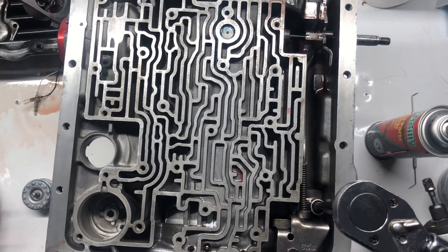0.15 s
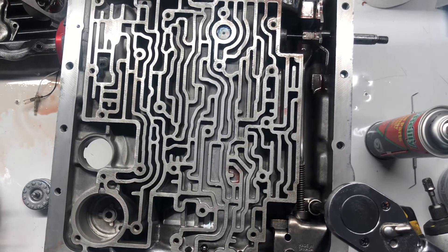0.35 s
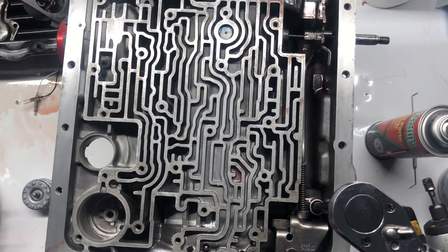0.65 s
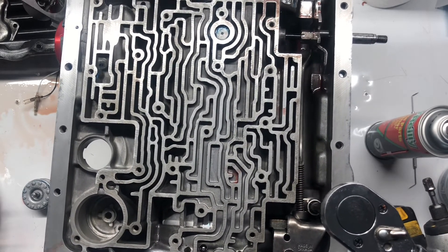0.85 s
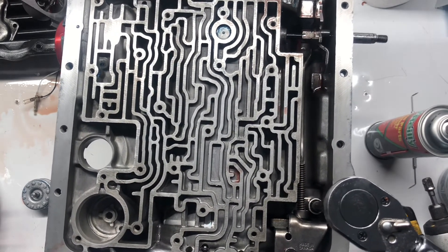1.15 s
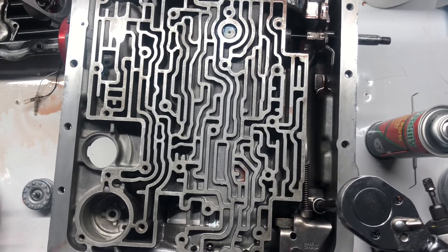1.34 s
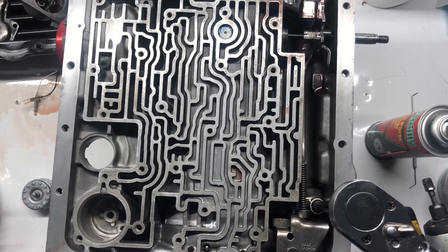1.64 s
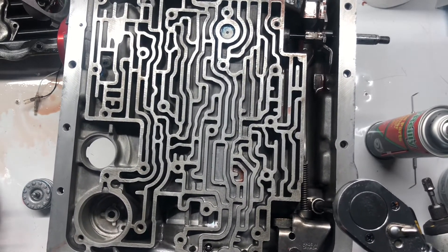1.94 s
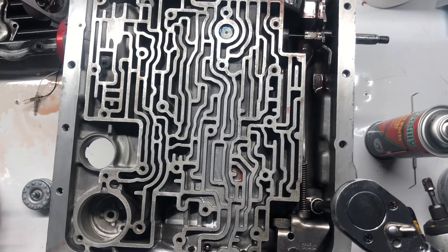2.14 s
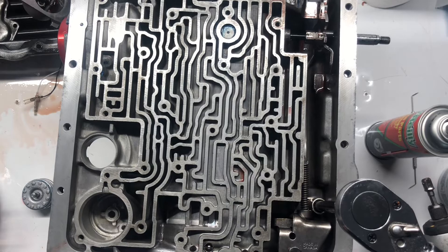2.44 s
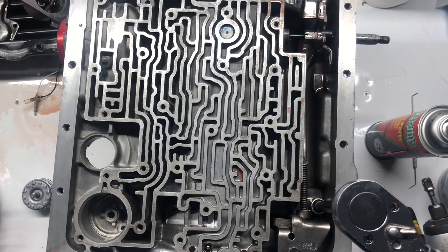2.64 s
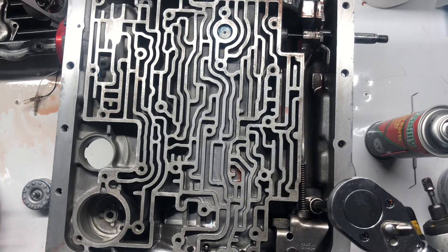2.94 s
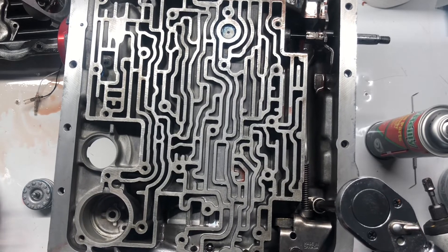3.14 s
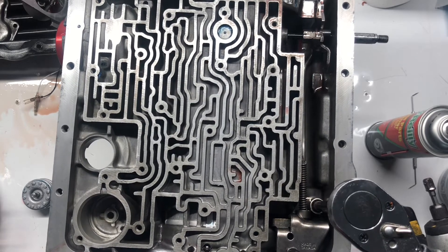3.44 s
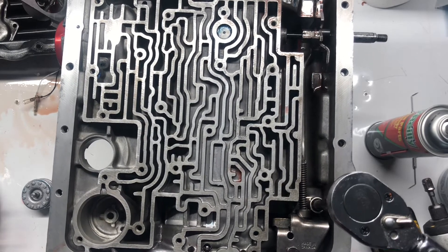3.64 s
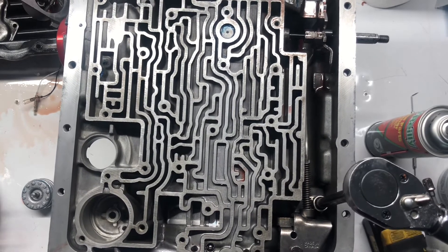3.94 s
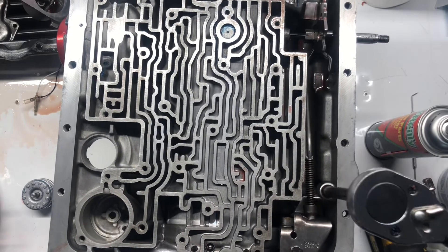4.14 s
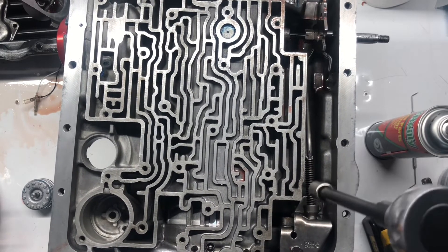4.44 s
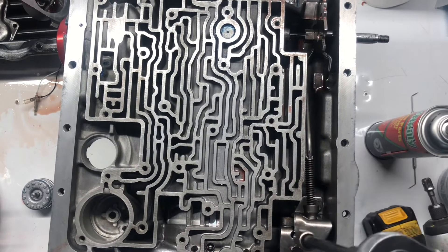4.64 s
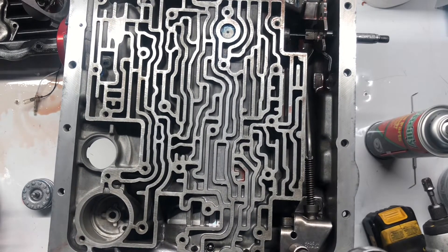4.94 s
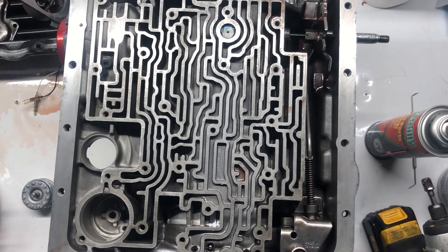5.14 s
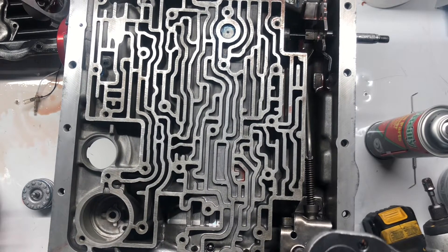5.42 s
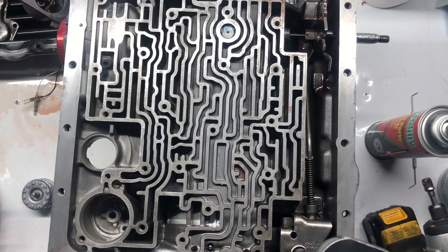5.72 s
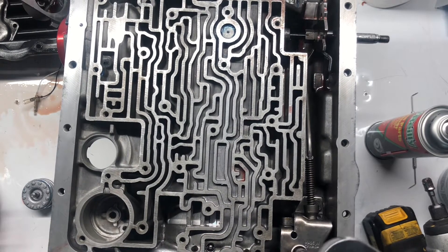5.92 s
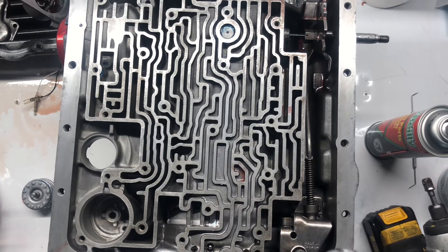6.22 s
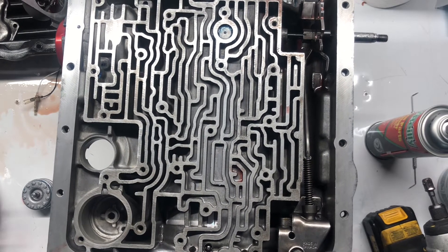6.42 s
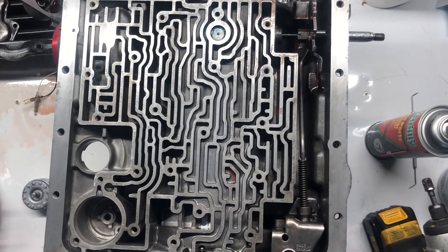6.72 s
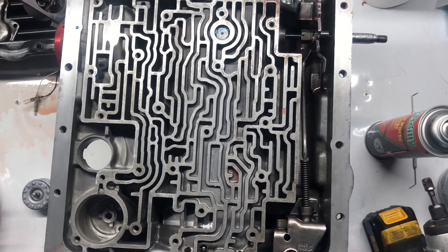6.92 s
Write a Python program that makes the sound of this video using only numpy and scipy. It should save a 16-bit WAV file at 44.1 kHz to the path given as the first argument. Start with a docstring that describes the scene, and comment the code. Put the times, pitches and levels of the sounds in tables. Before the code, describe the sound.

A quiet workshop heard from close by, with faint steady hum, low rumble and soft hiss from distant machines throughout. At 0.5 s a torque wrench gives a firm, short double-edged click, repeated at 0.94 s with a longer ring after a tiny tap. A freer, steely click rings at 1.66 s, followed by a dull handle bump at 1.76 s. A softer click comes at 2.48 s and a stronger one at 3.18 s. Light handle touches at 3.7 s lead into a thin swelling scrape, then a very loud, bright knock at 3.96 s with small bounces and a heavier casting clank at 4.03 s. At 4.69 s a socket knocks and rattles briefly. A sharp double clack lands at 4.98 s with a low bench thud. Faint slide at 5.5 s, high pin tick at 5.65 s, small taps at 6.0 and 6.64 s, then near quiet.

```python
"""Torque wrench in a workshop

A click-type torque wrench works on small bolts in a quiet workshop, close to one microphone.
Its pawl snaps over and rings the steel body; extension and socket come off, knock, bounce and are set down.
Each blow sums decaying modes with shaped noise; ticks, taps, bumps and light slides are filtered noise or modes.
The shop answers with a short tail of fading noise, over the hum and hiss of machines running far off."""
import sys
import numpy as np
from scipy import signal
from scipy.fft import rfft, irfft, next_fast_len
from scipy.io import wavfile
from scipy.ndimage import uniform_filter1d

SR = 44100
rng = np.random.default_rng(int(sys.argv[2]) if len(sys.argv) > 2 else 0)


def level_to_linear(level):
    """Convert decibel levels to linear amplitude factors, elementwise."""
    exponent = np.asarray(level, float) / 20
    return 10 ** exponent


def persist_wave(psi):
    """Save psi, clipped to +-1, as 16-bit WAV."""
    counts = np.round(np.clip(psi, -1, 1) * 32767).astype(np.int16)
    wavfile.write(sys.argv[1], SR, np.atleast_2d(counts).T)


N = 311787


def colour(x, points):
    """Linear filtering: a spectrum is multiplied by a gain drawn through (Hz, dB) points on a log axis."""
    hz, db = np.transpose(points)
    size = next_fast_len(len(x) + 4096)
    f = np.arange(size // 2 + 1) * SR / size + 1  # the 1 Hz offset avoids log(0)
    gain = level_to_linear(np.interp(np.log(f), np.log(hz), db))
    return irfft(rfft(x, size) * gain, size)[:len(x)]


def band(x, hz, width):
    """Simple resonance: two poles pass a band around the centre, where the gain is 1."""
    centre = min(hz, .45 * SR)
    q = hz / np.clip(width, 1, .4 * SR)
    b, a = signal.iirpeak(centre, q, SR)
    return signal.lfilter(b, a, x)


def level(x, db):
    """Mean power: scale a signal to an rms level."""
    return x * level_to_linear(db) / np.sqrt(np.mean(x ** 2))


def add(out, s, sound, db):
    """Superposition: add a sound at a time, its peak estimated from its strongest few milliseconds."""
    i = int(s * SR)
    peak = 2.4 * np.sqrt(uniform_filter1d(sound ** 2, SR // 300).max())
    out[i:i + len(sound)] += (sound * level_to_linear(db) / peak)[:N - i]


def ring(modes, rise_s, grip_hz=0):
    """Modal decay: wide modes start big and die fast, low ones build up over a few cycles; a grip damps all."""
    t = np.arange(int(.45 * SR)) / SR
    hz, width, db = np.transpose(modes)[:, :, None]
    width = width + grip_hz * (1 + hz / 6000)
    phase = rng.uniform(0, 2 * np.pi, hz.shape)
    swell = 1 - np.exp(-t / (rise_s + 1.7 / hz))
    decay = np.exp(-np.pi * width * t)
    return np.sum(level_to_linear(db) * width * swell * decay * np.sin(2 * np.pi * hz * t + phase), axis=0)


def cluster(modes, count=10):
    """Mode splitting: a thick part has several close modes where a bar has one; they beat and roughen the ring."""
    split = []
    for hz, width, db, spread_hz in modes:
        if spread_hz == 0:
            split.append((hz, width, db))
            continue
        for offset in rng.standard_normal(count):
            split.append((hz + spread_hz * offset, width, db - 10 * np.log10(count)))
    return split


def blows(rows, modes, long_modes, grit, feel):
    """Impact excitation: a few milliseconds of chatter, a fainter wash of countless small modes, and the ring."""
    out = np.zeros(N)
    ring_db, treble_db, chatter_s, wash_db, wash_s = feel
    hardest_db = max(row[1] for row in rows)
    for s, peak_db, low_db, free_db in rows:
        body = ring(modes, 0.00089, grip_hz=34.8) + level_to_linear(free_db) * ring(cluster(long_modes), .002)
        t = np.arange(len(body)) / SR
        contact_s = chatter_s * 2 ** (low_db / 9)  # heavier contact chatters longer, doubling every 9 dB
        noise = rng.standard_normal(len(t)) * (1 - np.exp(-t / 0.00015))
        # a blow that rings less rattles more
        wash = level_to_linear(wash_db - 0.5 * free_db) * noise * np.exp(-t / wash_s)
        # the wash is duller than the chatter: -4 dB at 12 kHz
        duller = wash + (level_to_linear(-4) - 1) * band(wash, 12000, 13000)
        chatter = colour(noise * np.exp(-t / contact_s) + duller, grit)
        head = slice(0, SR // 100)  # ring and chatter are balanced over the first 10 ms
        both = level_to_linear(ring_db) * body / body[head].std() + chatter / chatter[head].std()
        # softer blows lose treble: 0.51 dB per dB
        high_db = treble_db + 0.51 * (peak_db - hardest_db)
        bright = colour(both, [(1200, -60), (1700, 0.0), (6500, 0), (9500, high_db)])
        low = colour(both, [(350, low_db - 13), (750, low_db), (1400, low_db), (2000, -60.5)])
        # the slow bending of the whole part sets in a moment after the snap
        low = np.roll(low, int(0.0011 * SR))
        add(out, s, bright + low, peak_db)
    return out


def burst(fade_s, bands):
    """Source and filter: a fading puff of noise passes twice through each resonance, for steep bands."""
    t = np.arange(SR // 4) / SR
    grit = rng.standard_normal(len(t)) * np.exp(-t / fade_s)
    out = np.zeros(len(t))
    for hz, width, db in bands:
        steep = band(band(grit, hz, width), hz, 1.4 * width)
        out += level_to_linear(db) * np.sqrt(1000 / width) * steep  # even power whatever the width
    return out


def taps(rows, thing):
    """Struck resonator: each tap excites the bands of one small thing, tilted about 1 kHz."""
    out = np.zeros(N)
    for s, db, tilt_db, fade_s in rows:
        tilted = [(hz, width, g + tilt_db * np.log2(hz / 1000)) for hz, width, g in thing]
        add(out, s, burst(fade_s, tilted), db)
    return out


# spectrum of the shop's hiss: pitch_hz, relative_level_db (per Hz)
HISS_COLOUR = [(760, -32.5), (1300, -5.5), (1680, 1.5), (2140, -3), (2770, -5), (3140, -9), (4420, -9.5),
               (15200, -38.5), (16500, -32)]
# spectrum of the low rumble: pitch_hz, relative_level_db (per Hz)
RUMBLE_COLOUR = [(30, -26.5), (45, -1), (100, -3), (200, -6), (400, -4.5), (700, -10.5), (1000, -5.5),
                 (1400, -11.5), (2000, -42.5)]
# narrow humming bands of noise: pitch_hz, width_hz, rms_level_db
HUM_BANDS = [(48.5, 10, -69.5), (90.2, 9.4, -81), (111.53, 10, -67), (236.7, 12, -71), (276.9, 20, -67),
             (348.9, 20, -69), (571.1, 50, -60.5), (1012.5, 60, -77)]
# steady motor tones: pitch_hz, rms_level_db
MOTOR_TONES = [(118.4, -65.5), (736, -69.5), (1040, -65)]


def shop_air():
    """Stationary noise: hiss, rumble and humming bands, with motor tones modulated a little in phase and level."""
    t = np.arange(N) / SR
    out = level(colour(rng.standard_normal(N), HISS_COLOUR), -66)
    out += level(colour(rng.standard_normal(N), RUMBLE_COLOUR), -59)
    for hz, width, db in HUM_BANDS:
        out += level(band(rng.standard_normal(N), hz, width), db)
    for hz, db in MOTOR_TONES:
        waver = level(uniform_filter1d(rng.standard_normal(N), SR // 6), 0)
        tone = np.sin(2 * np.pi * hz * t + 0.28 * waver)  # phase wavers by 0.28 rad rms
        out += level(tone * level_to_linear(waver), db)  # level wavers by 1 dB rms
    return out


# short faint puffs of noise, some just before a loud knock: start_s, peak_level_db, pitch_hz, fade_s
FAINT_TICKS = [(.052, -61, 14000, .008), (.272, -66, 15000, .005), (1.763, -51, 13000, .015),
               (3.943, -36, 3500, 0.01), (3.9575, -30, 3997, .0032), (4.955, -47, 4500, 0.0084),
               (4.962, -48.5, 6000, 0.0088), (5.345, -44, 9860, 0.0032), (5.59, -58.5, 9000, 0.00806),
               (6.863, -59, 12000, 0.00299), (6.886, -57.5, 14000, 0.00345)]


def faint_ticks():
    """Broadband transient: each tick is a puff of noise in one band, set 1.2 times as wide as its pitch."""
    out = np.zeros(N)
    for s, db, hz, fade_s in FAINT_TICKS:
        add(out, s, burst(fade_s, [(hz, 1.2 * hz, 0)]), db)
    return out


# each click is two close contacts: a louder, brighter snap, then a softer one with more low sound:
# start_s, peak_level_db, weight_db (gain under about 1.5 kHz), long_ring_db
SEATED_BLOWS = [(.514, -17, -7.5, -5), (0.5173, -19.5, 3, -6), (0.9365, -17.5, -6.5, 1.5),
                (.940, -21.5, 3, 13)]
# short modes of the seated wrench: pitch_hz, width_hz (before the grip), level_db (at the top)
SEATED_MODES = [(420, 56, -6), (809.6, 11, 0), (1046.4, 9.6, -5.5), (1454, 25.6, -5.5), (2184, 73, -13),
                (4457, 41, -19), (5305, 47, -23.5), (7546, 15, -22.5), (8840, 49, -22.5), (10160, 36, -32),
                (13300, 30, -32), (15610, 39, -30.5)]
# long-ringing clusters: pitch_hz, width_hz, level_db, spread_hz
SEATED_LONG_MODES = [(1100, 4, 4.5, 0), (1331.4, 19.2, -13, 25.5), (2200, 25, -31, 90),
                     (4400, 4, -25, 251.5), (4930, 4, -25, 350), (8470, 9, -36.5, 900.5)]
# colour of the chatter: pitch_hz, level_db
SEATED_CHATTER = [(180, -52), (330, 2.5), (574, -18), (1100, 3), (1970, -10.5), (2250, -11), (3950, -19),
                  (4440, -11), (5100, -14), (8940, -22), (16000, -38)]
# how it takes a blow: ring_over_chatter_db, treble_db (hardest blow), chatter_s (at 0 dB weight),
# wash_db (at 0 dB long ring), wash_s
SEATED_RESPONSE = (-2.23, -0.4, 0.0017, -27, .05)


def seated_clicks():
    """Modal excitation: the pawl snaps while the wrench is seated, sounding its modes and chatter."""
    return blows(SEATED_BLOWS, SEATED_MODES, SEATED_LONG_MODES, SEATED_CHATTER, SEATED_RESPONSE)


# dull bumps: start_s, peak_level_db, swell_s (each mode adds its own build-up)
BENCH_BUMPS = [(.518, -38, 0.0038), (1.763, -35, 0.021), (4.705, -40, 0.0035), (4.988, -36, 0.0078)]
# resonances of the bench top: pitch_hz, width_hz, level_db
BENCH_MODES = [(121.6, 15.3, 1), (227, 23.2, -8), (328, 16.4, -9), (414.7, 31.6, -9), (485.4, 26.5, -3),
               (933.6, 61, -8.5)]


def bench_bumps():
    """Plate resonance: slow-rising bumps sound the low modes of the bench top."""
    out = np.zeros(N)
    for s, db, swell_s in BENCH_BUMPS:
        add(out, s, ring(BENCH_MODES, swell_s), db)
    return out


# start_s, peak_level_db, tilt_db (per octave), fade_s
SMALL_PART_TAPS = [(.896, -39.5, -3.5, .0045), (6.0053, -31, -4, .0012), (6.009, -41, -.5, .009),
                   (6.644, -32, 0.8, 0.0077)]
# bands of a small part: pitch_hz, width_hz (of the first pass), level_db (before tilt)
SMALL_PART_BANDS = [(2014, 970, 1), (2900, 800, .4), (4176, 750, -1), (5750, 1420, -4), (7960, 1600, -14)]


def part_taps():
    """Filtered impact: a small part is tapped and sounds in its broad bands."""
    return taps(SMALL_PART_TAPS, SMALL_PART_BANDS)


# pawl snaps of the free wrench: start_s, peak_level_db, long_ring_db
FREE_CLICKS = [(1.6602, -21.5, 2), (2.4845, -28, 4.5), (3.1782, -20.5, .3)]
# short modes of the wrench body: pitch_hz, width_hz (before the grip), level_db (at the top)
WRENCH_MODES = [(1019, 41, -5), (2169, 41, -12), (2670, 63, -23), (3159, 94, -21), (4260, 40, .4),
                (7041.5, 166, -9), (8815, 58, -26.5), (8959, 67, -6), (11450, 183, -11), (11588, 140, -21),
                (15438, 156, -10)]
# long-ringing clusters: pitch_hz, width_hz, level_db, spread_hz
WRENCH_LONG_MODES = [(1128, 3, 4, 0), (1075, 12, -4, 0), (1687, 8, -14, 30), (2731, 8, -13, 40),
                     (4160, 5, -24, 0), (4300, 8, -13, 130), (6363, 4, -19, 0), (6950, 12, -20, 150)]
# colour of the chatter: pitch_hz, level_db
WRENCH_CHATTER = [(470, -30), (800, -20), (1090, -0.5), (1350, -10.5), (2180, -9), (3600, -15),
                  (4240, -7.5), (5510, -16), (8880, -9.5), (10700, -16), (16000, -26.5)]
# ring_over_chatter_db, treble_db (hardest), chatter_s (0 dB weight), wash_db (0 dB long ring), wash_s
WRENCH_RESPONSE = (0.1, -5, 0.0103, -23, 0.0371)


def free_clicks():
    """Free vibration: the pawl snaps over and rings the steel body, every snap with one weight of -1.5 dB."""
    rows = [(s, db, -1.5, ring_db) for s, db, ring_db in FREE_CLICKS]
    return blows(rows, WRENCH_MODES, WRENCH_LONG_MODES, WRENCH_CHATTER, WRENCH_RESPONSE)


# start_s, peak_level_db, tilt_db (per octave), fade_s
HANDLE_TOUCHES = [(1.7605, -32, -3, 0.0224), (3.696, -35, .3, .012), (3.754, -36, 5, .0035)]
# bands of the handle: pitch_hz, width_hz (of the first pass), level_db (before tilt)
HANDLE_BANDS = [(950.8, 780, .5), (3500, 2870, -8), (7000, 5000, -11), (13000, 5980, -15)]


def handle_taps():
    """Damped impact: taps on the handle give very broad bands of fading noise."""
    return taps(HANDLE_TOUCHES, HANDLE_BANDS)


# metal sliding lightly: start_s, end_s, end_level_db (rms), swell_db, pitch_share
LIGHT_SLIDES = [(3.76, 3.958, -66, 12, .6), (5.46, 5.555, -71, .3, .99)]
# what it rings with: pitch_hz (before pitch_share), width_hz, level_db
SLIDE_BANDS = [(5970, 1500, 0.5), (7600, 490, -1.5), (9000, 250, 1), (10800, 620, -6.5), (12500, 500, -9)]


def slides():
    """Friction noise: steady random excitation of a few resonances, swelling to the end of the slide."""
    out = np.zeros(N)
    for start, end, db, swell_db, share in LIGHT_SLIDES:
        grit = rng.standard_normal(int((end - start) * SR))
        scrape = sum(level_to_linear(g) * band(grit, share * hz, width) for hz, width, g in SLIDE_BANDS)
        swell = level_to_linear(np.linspace(-swell_db, 0, len(grit)))
        i = int(start * SR)
        out[i:i + len(grit)] += level(scrape, db) * swell
    return out


# start_s, peak_level_db, weight_db (gain under about 1.5 kHz), long_ring_db
EXTENSION_BLOWS = [(3.9604, -6.5, -5, -1), (3.9622, -8, 3, -1.5), (3.984, -23, 0, -1.5),
                   (3.997, -32.5, -1.5, -1.5)]
# short modes of the extension: pitch_hz, width_hz (before the grip), level_db (at the top)
EXTENSION_MODES = [(1041, 63, -5), (2872, 98, -7.5), (3940, 210, -6), (5450, 130, -9.5), (5793, 92, -4.5),
                   (6780, 190, -9.5), (7690, 100, -3.5), (8837, 170, 5), (10070, 109.3, -15),
                   (11400, 150, -15), (12200, 190, -14), (15520, 110, -19)]
# long-ringing clusters: pitch_hz, width_hz, level_db, spread_hz
EXTENSION_LONG_MODES = [(1071.2, 25, -6.5, 13), (3940, 15, -12, 200), (5600, 20, -17, 500),
                        (9080, 30, -15, 200)]
# colour of the chatter: pitch_hz, level_db
EXTENSION_CHATTER = [(350, -55.5), (600, -28.5), (1040, -1.5), (2570, -12.5), (4050, -10), (4710, -21),
                     (5190, -3), (8270, -11.5), (8860, -7), (10300, -15.5), (16000, -30.5)]
# ring_over_chatter_db, treble_db (hardest), chatter_s (0 dB weight), wash_db (0 dB long ring), wash_s
EXTENSION_RESPONSE = (-4.5, .8, .0035, -17, .016)


def extension_knocks():
    """Repeated impact: the extension knocks and bounces, each contact exciting its modes anew."""
    return blows(EXTENSION_BLOWS, EXTENSION_MODES, EXTENSION_LONG_MODES, EXTENSION_CHATTER,
                 EXTENSION_RESPONSE)


# start_s, peak_level_db, weight_db (gain under about 1.5 kHz), long_ring_db
CASTING_BLOWS = [(4.029, -8, -1.63, -3), (4.034, -13, -3, 8)]
# short modes of the casting: pitch_hz, width_hz (before the grip), level_db (at the top)
CASTING_MODES = [(1090.6, 85, 6.5), (2226.7, 150, 7), (4100, 120, -17), (4210, 140, -21),
                 (6100, 250, -18.5), (6100, 150, -9), (6604, 85, 1), (7026, 76, -11.5), (9610, 87, -15),
                 (10270, 82, -12.5), (12000, 100, -19.5), (15100, 140, -25.5)]
# long-ringing clusters: pitch_hz, width_hz, level_db, spread_hz
CASTING_LONG_MODES = [(1114, 9, -20, 0), (1940, 10, -11, 50), (2120, 3, -6, 50), (2340, 3, -7, 25),
                      (3400, 10, -20, 150), (4300, 10, -19, 500), (6300, 10, -21, 600)]
# colour of the chatter: pitch_hz, level_db
CASTING_CHATTER = [(290, -39.5), (500, -23), (1000, -6.5), (1670, -1.5), (2070, -2.5), (2610, -15),
                   (4400, -5.5), (4940, -13.5), (7000, -11.5), (7750, -14), (16000, -32)]
# ring_over_chatter_db, treble_db (hardest), chatter_s (0 dB weight), wash_db (0 dB long ring), wash_s
CASTING_RESPONSE = (-7, -1.21, 0.0056, -26, .035)


def casting_knocks():
    """Modal density: knocks on a casting sound close groups of modes that beat together."""
    return blows(CASTING_BLOWS, CASTING_MODES, CASTING_LONG_MODES, CASTING_CHATTER, CASTING_RESPONSE)


# start_s, peak_level_db, weight_db (gain under about 1.5 kHz), long_ring_db
SOCKET_BLOWS = [(4.6872, -18.5, -3, 0), (4.697, -29.5, -4, -3.5), (4.7035, -26, -0.5, -2),
                (4.7167, -29, 7.5, -7), (4.732, -47.5, 6, -3.5)]
# short modes of the socket: pitch_hz, width_hz (before the grip), level_db (at the top)
SOCKET_MODES = [(822, 140, 4.5), (2014, 88, -13), (4490, 84, -4), (5310, 360, -2.5), (5960, 170, -10),
                (7113, 81, -2), (8075, 184, -5), (8950, 100, -4), (12240, 116, 0)]
# long-ringing clusters: pitch_hz, width_hz, level_db, spread_hz
SOCKET_LONG_MODES = [(862, 20, -16.5, 27), (3690, 20, -6.5, 130), (8985, 15, -17.5, 60),
                     (11900, 20, -17.5, 200)]
# colour of the chatter: pitch_hz, level_db
SOCKET_CHATTER = [(350, -42.5), (600, -15), (823, -2), (1800, -14), (2610, -10), (3080, -14.5),
                  (4050, -2.5), (9110, -16), (9890, -21.5), (12200, -14), (16000, -34.5)]
# ring_over_chatter_db, treble_db (hardest), chatter_s (0 dB weight), wash_db (0 dB long ring), wash_s
SOCKET_RESPONSE = (-4.5, 2, 0.003, -23, .025)


def socket_knocks():
    """Repeated impact: the socket knocks and bounces, softer contacts losing treble."""
    return blows(SOCKET_BLOWS, SOCKET_MODES, SOCKET_LONG_MODES, SOCKET_CHATTER, SOCKET_RESPONSE)


# start_s, peak_level_db, weight_db (gain under about 1.5 kHz), long_ring_db
LAY_DOWN_BLOWS = [(4.9761, -12, -5.5, -4), (4.9785, -13.5, 1, 5)]
# short modes of what is laid down: pitch_hz, width_hz (before the grip), level_db (at the top)
LAY_DOWN_MODES = [(833, 62, 1.5), (2292, 152, -8.5), (2702.4, 88, -4), (3690, 93, -8.5), (4055, 100, -8),
                  (5020, 110, -12.5), (5590, 122, -2.5), (7000, 112, -6.5), (7882, 170, -2.5),
                  (9000, 110, -8), (11195, 250, -10.5), (13740, 300, -6.5)]
# long-ringing clusters: pitch_hz, width_hz, level_db, spread_hz
LAY_DOWN_LONG_MODES = [(2280, 11, -8, 30), (2780, 8, -9, 40), (3635, 8, -15, 60), (5006, 8, -11, 250),
                       (8043, 9, -17, 80), (9039, 12, -17, 80)]
# colour of the chatter: pitch_hz, level_db
LAY_DOWN_CHATTER = [(240, -41), (400, -17.5), (893, -4.5), (1580, -21), (2220, -5.5), (3260, -13),
                    (4950, -3), (6150, -7.5), (7870, -8), (13500, -11), (16000, -32)]
# ring_over_chatter_db, treble_db (hardest), chatter_s (0 dB weight), wash_db (0 dB long ring), wash_s
LAY_DOWN_RESPONSE = (-3.5, -0.74, 0.0046, -28, 0.0275)


def lay_downs():
    """Double impact: a bright knock, then about 2 ms later a slightly softer one, lower and longer in ring."""
    return blows(LAY_DOWN_BLOWS, LAY_DOWN_MODES, LAY_DOWN_LONG_MODES, LAY_DOWN_CHATTER, LAY_DOWN_RESPONSE)


# start_s, peak_level_db, tilt_db (per octave), fade_s
SMALL_PIN_TAPS = [(5.636, -42.5, 1.5, 0.0032), (5.6465, -27.5, 0.29, .005)]
# bands of a pin: pitch_hz, width_hz (of the first pass), level_db (before tilt)
PIN_BANDS = [(2870, 1000, -10.5), (4590, 820, -8), (7770, 1500, -3.5), (10550, 1680, .5),
             (12540, 1600, -9.5), (14755, 390, -9)]


def pin_taps():
    """Filtered impact: taps on a small pin sound mostly in high bands."""
    return taps(SMALL_PIN_TAPS, PIN_BANDS)


# tail of the shop: pitch_hz, t60_s, level_db (of the whole band's energy, before the build-up)
ROOM_BANDS = [(299.8, 0.43, -23), (705, 0.2, -30), (1400, .6, -22.5), (2510, 0.609, -20.5),
              (4500, 0.25, -24), (7996, 0.17, -43.5), (13000, 0.23, -23)]


def room(x):
    """Diffuse reverberation: dense reflections build up in 4 ms, each band fading at its own rate."""
    t = np.arange(int(.8 * SR)) / SR
    tail = np.zeros(len(t))
    for hz, t60, db in ROOM_BANDS:
        noise = level(band(rng.standard_normal(len(t)), hz, 0.55 * hz), 0)
        # the division gives about the same energy whatever the decay time
        tail += level_to_linear(db) * noise * 1000. ** (-t / t60) / np.sqrt(t60 * SR / 14)
    return signal.fftconvolve(x, tail * np.clip(t / 0.004, 0, 1))[:N]


def scene():
    """Superposition: near sounds, their reverberation and the background add linearly."""
    near = faint_ticks() + seated_clicks() + bench_bumps() + part_taps() + free_clicks() + handle_taps()
    near += slides() + extension_knocks() + casting_knocks() + socket_knocks() + lay_downs() + pin_taps()
    return (near + room(near) + shop_air())[None]


def low_pass(x):
    """Removes everything above the highest recorded frequency."""
    return signal.sosfilt(signal.butter(12, 17140, fs=SR, output="sos"), x)


def record(dry):
    """Band limiting: the recorder cuts the deep bass below 41 Hz and the top above 16.4 kHz."""
    no_bass = signal.sosfilt(signal.butter(6, 41, "high", fs=SR, output="sos"), dry)
    mix = signal.sosfilt(signal.ellip(8, .2, 70, 16400, fs=SR, output="sos"), no_bass)
    return low_pass(mix)


dry = scene()
out = record(dry)
persist_wave(out)
```